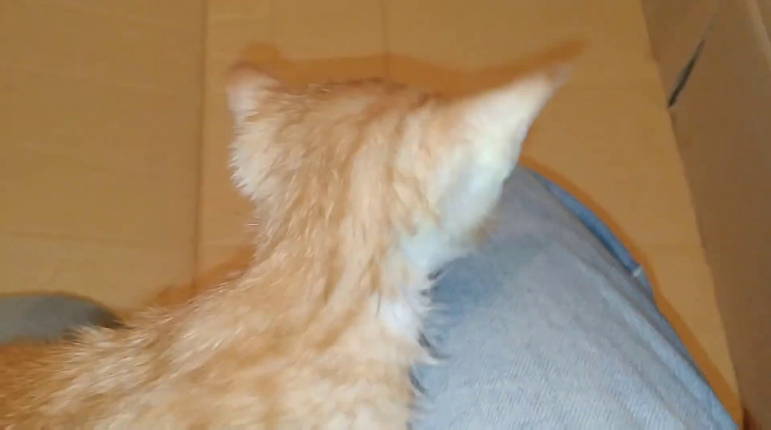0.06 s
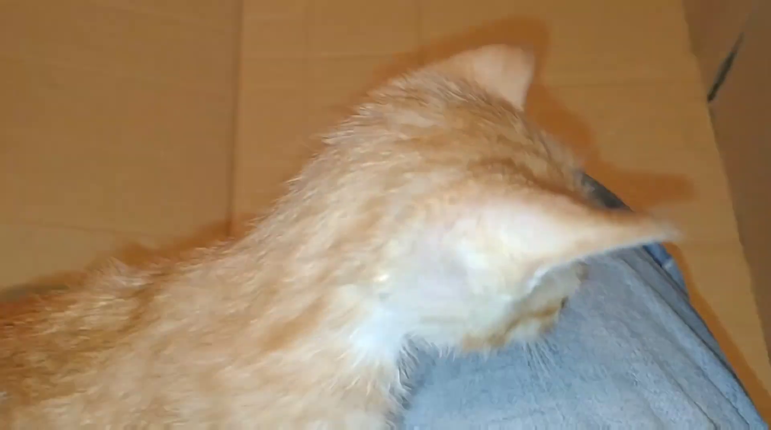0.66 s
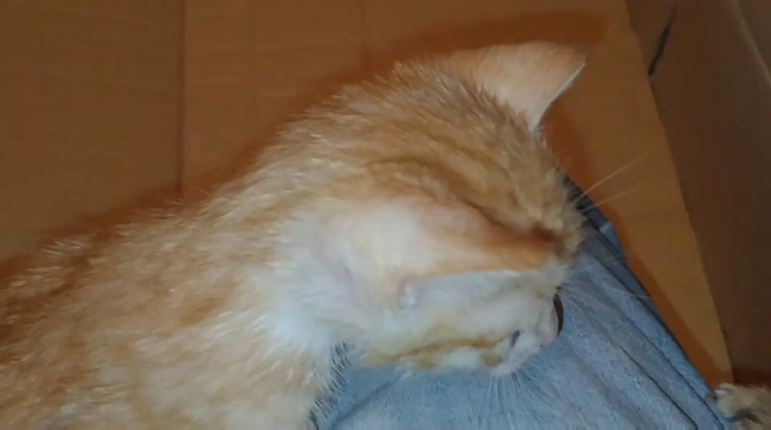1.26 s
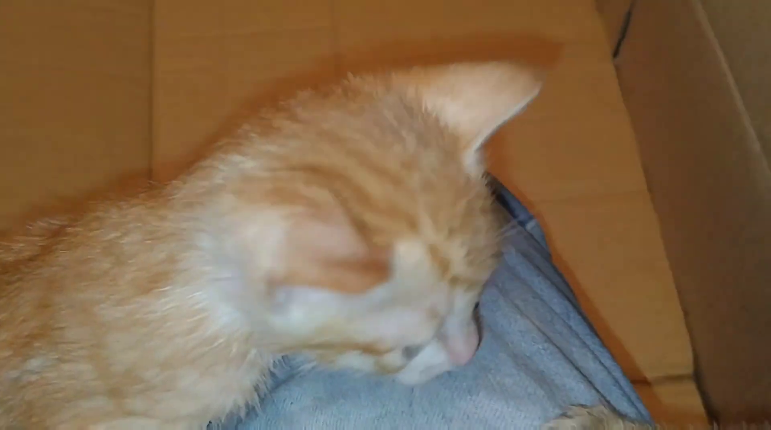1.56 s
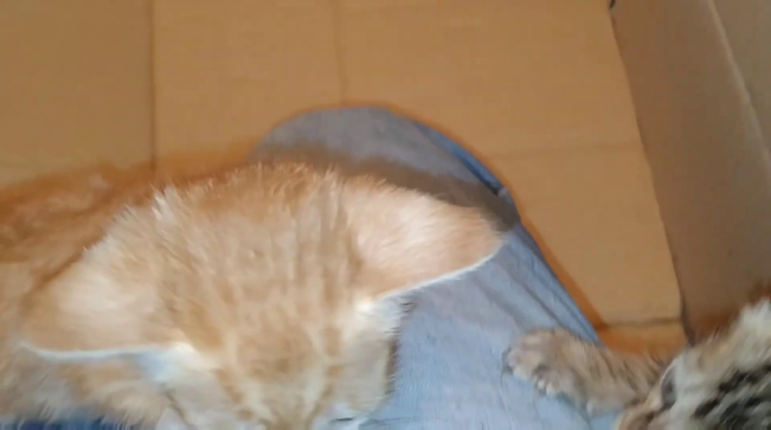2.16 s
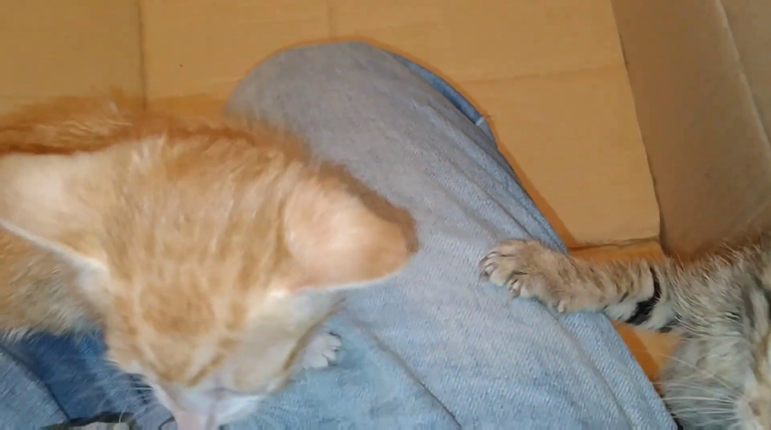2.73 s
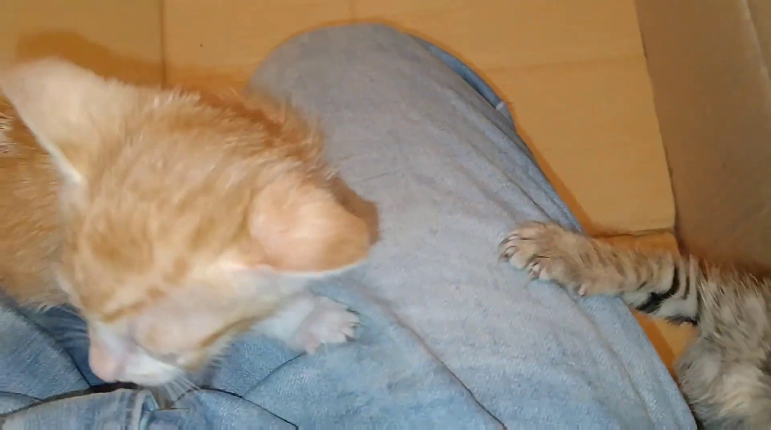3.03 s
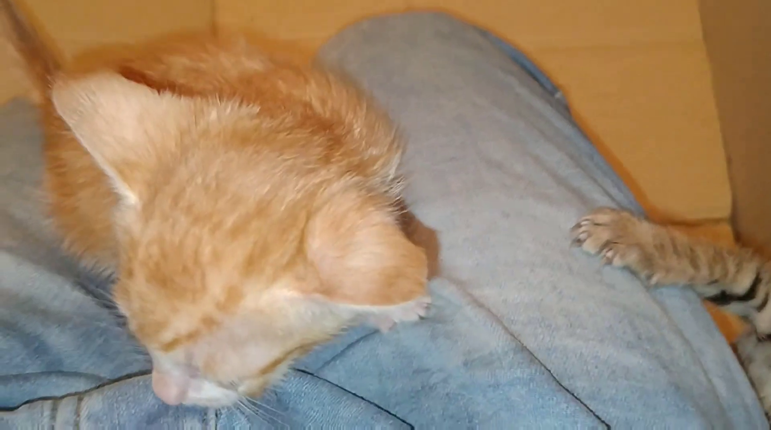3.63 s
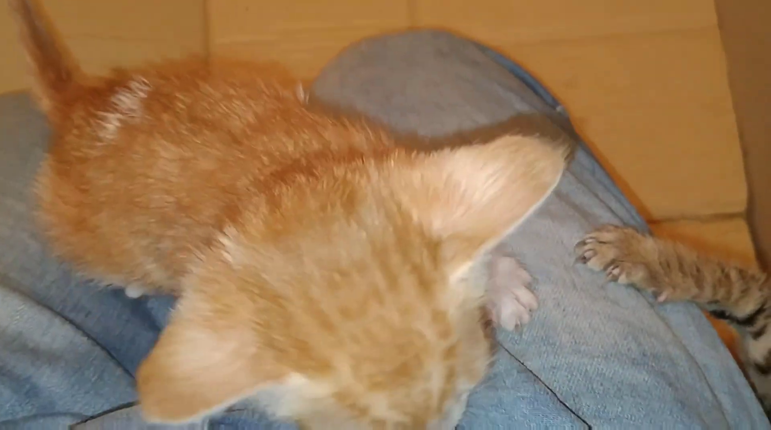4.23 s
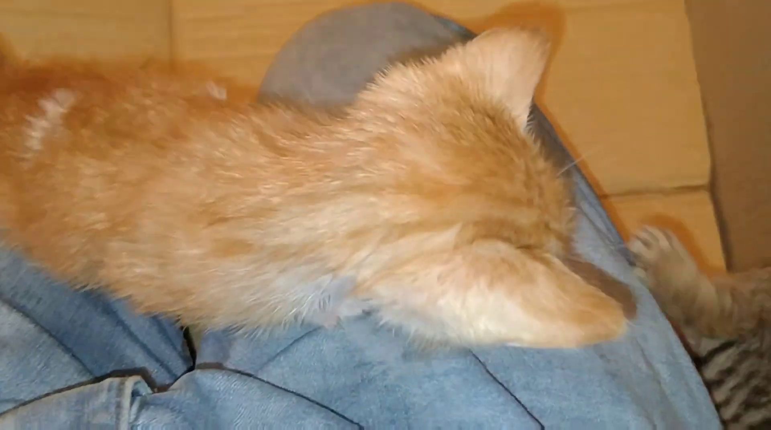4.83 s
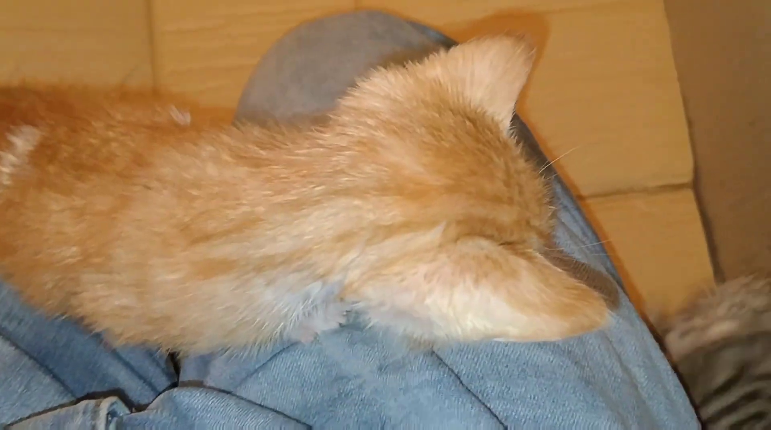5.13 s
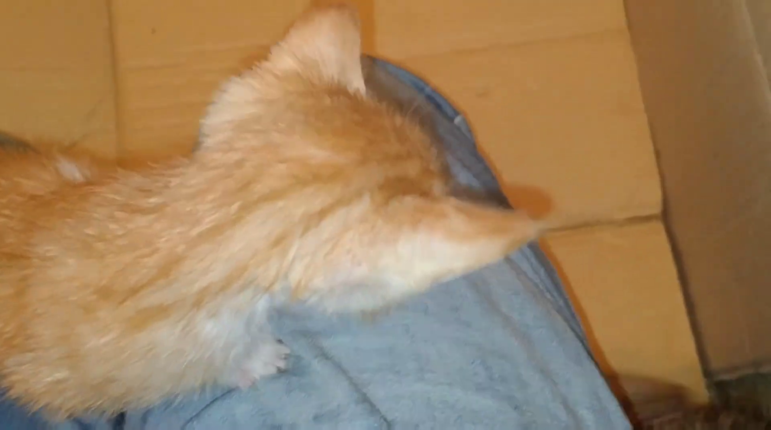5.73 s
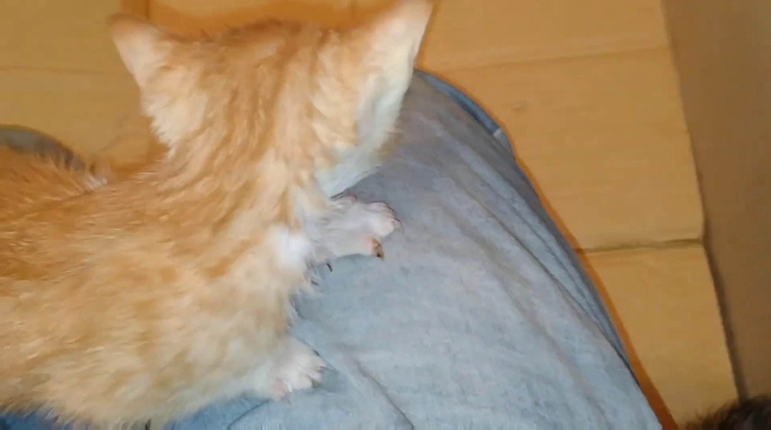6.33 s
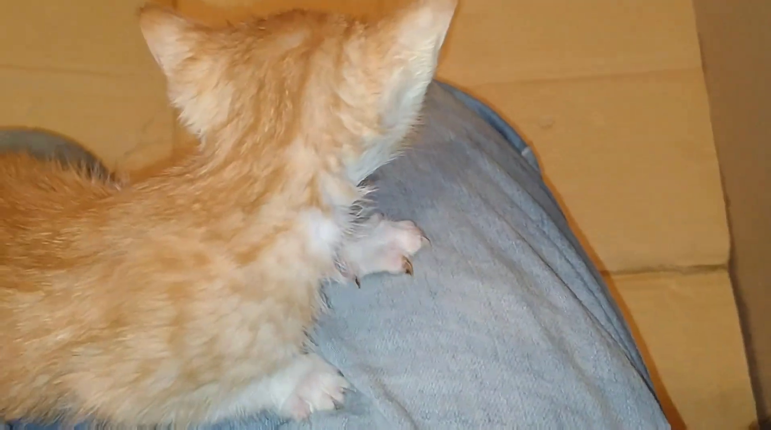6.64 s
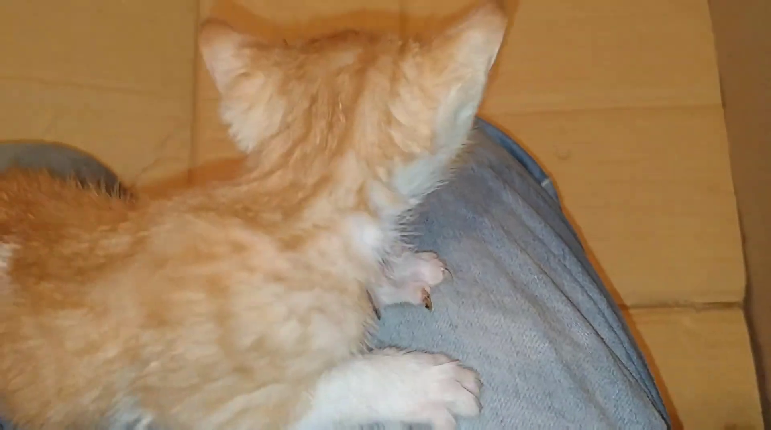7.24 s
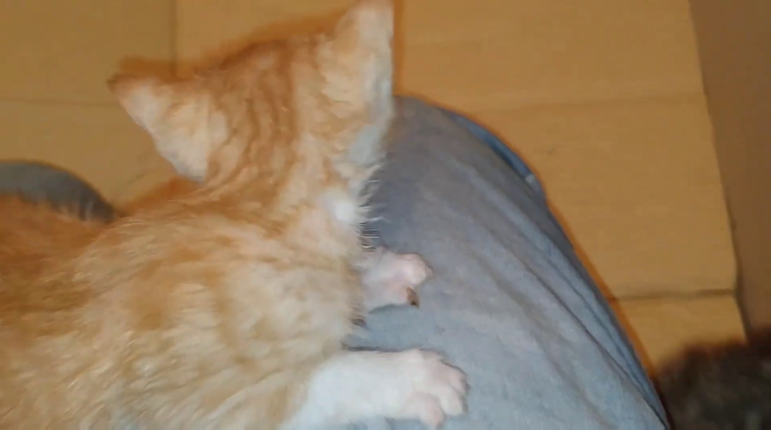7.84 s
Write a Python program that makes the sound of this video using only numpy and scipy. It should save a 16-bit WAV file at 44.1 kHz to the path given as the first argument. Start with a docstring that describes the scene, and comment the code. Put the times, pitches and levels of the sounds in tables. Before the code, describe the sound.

A kitten's claws scratch and pluck at denim and pat cardboard, with one faint mew in a quiet, humming room.

```python
"""A quiet room, a small microphone close to a cardboard box where two kittens clamber over a denim lap.
Claws snag and pluck the threads, paws drag over the cloth and pat the cardboard, and one hard scrape
judders as it sticks and slips. A kitten gives one thin, faint mew. Fur rustles throughout; behind it
lie the room's low hum and rumble, a bright hiss and a few faint whines."""
import sys
import numpy as np
from scipy import signal
from scipy.fft import rfft, irfft
from scipy.io import wavfile

SR = 44100
rng = np.random.default_rng(int(sys.argv[2]) if len(sys.argv) > 2 else 0)


def transcribe(u):
    """Save the signal u as a 16-bit wav file named by the first command-line argument.

    u: samples, shape (n,) or (channels, n), limited to [-1, 1]; the rate is SR.
    q: integer samples, one column per channel.
    """
    v = np.clip(np.atleast_2d(u).T, -1, 1)
    q = np.round(v * 32767).astype(np.int16)
    wavfile.write(sys.argv[1], SR, q)


N = 352032
T = np.arange(N) / SR

# Spectrum of a claw rasping on denim: f/Hz, relative level/dB
CLAW_SPECTRUM = [(200, -42.5), (1000, -35.5), (2000, -36), (2900, -34.5), (3700, -19.5), (4800, -13),
                 (5700, -8), (6250, -4.5), (6750, -0.5), (7400, 3.5), (7800, -5), (8200, -19.5),
                 (8700, -43.5)]
# Spectrum of a plucked thread: f/Hz, relative level/dB
THREAD_SPECTRUM = [(200, -39.5), (1000, -26.5), (2000, -41.5), (2950, -42.5), (3650, -25.5), (4700, -17.5),
                   (5700, -8), (6600, -1.5), (7400, 4), (7850, -2), (8250, -21), (8700, -32.5)]
# Spectrum of the cardboard's flutes crunching: f/Hz, relative level/dB
CRUNCH_SPECTRUM = [(100, -17), (300, 10.5), (500, 2), (900, 1.5), (1300, -7.5), (1750, -3.5), (2150, -21.5),
                   (2600, -26.5), (4000, -27)]


def claw_snags(snap_s=0.00064, fray_s=0.0038, ring_db=-17):
    """Close up, a claw plucks a thread: fibres snap in a burst, longer the more the thread frays."""
    # t/s, level/dB, treble tilt/(dB per kHz), fraying/0-1
    plucks = [(0.154, -54, 8, 0), (0.354, -53, 10, 0.15), (0.3584, -50, 11, 0.7), (0.452, -49, -.5, .15),
              (0.483, -54, -0.5, 0.1), (0.5981, -43.5, -2, 0.12), (0.633, -50.5, -3, 0.4),
              (0.884, -48.5, -6, .6), (0.9176, -50.5, -2.5, 0), (0.9507, -50.5, -3, 0.3),
              (1.043, -55.5, -3, 0.2), (1.1, -51, 1, .1), (1.107, -46, -2, 0), (1.2676, -54.5, -4.5, 0.6),
              (1.351, -52, -4, 0), (1.4464, -51, -.5, 0.8), (1.4691, -48, 1, 0), (1.5255, -41.5, -2, 0),
              (1.7157, -51, 1, 0), (2.5074, -51, 16, 0.3), (2.7061, -45, -4.5, 0.35), (2.721, -54, 0, 1),
              (2.7919, -51.5, -0.5, .7), (2.8875, -52, -1.5, 0.3), (3.035, -53, -1.5, 1),
              (3.0492, -57, 1, 1), (3.2602, -52, -0.5, 0.9), (3.736, -55.5, -7.5, .4),
              (3.8265, -50.5, -1.5, 0.3), (3.861, -53, -5, 0), (4.6105, -57.5, -6, 0.04),
              (4.662, -50, 18, .4), (4.6756, -54, -5, .9), (4.686, -51.5, 14, 0.4),
              (4.952, -50.5, 2.5, 0.1), (5.2307, -56.5, -2.5, .45), (5.2686, -51.5, 2.5, 0.5),
              (5.5082, -51, 2, 1), (5.6344, -37, 6, .3), (5.6506, -41, 0, 0.5), (5.8594, -55, 1.5, 0.9),
              (7.3645, -60, 7, 0.3)]
    out, t = np.zeros(N), np.arange(-128, 896) / SR
    for at, db, tilt, fray in plucks:
        burst = np.exp(-np.maximum(t / (snap_s + fray * fray_s), -t / snap_s) ** 2)
        small_snaps = rng.standard_normal(len(t)) * burst
        main_snap = .5 * (1 - fray) * (t == 0)
        snap = colour(small_snaps / np.linalg.norm(small_snaps) + main_snap, THREAD_SPECTRUM, tilt)
        add(out, at + t[0], amp(db) * short_unit(snap))
    return in_box(out, ring_db, t60=0.033)


def paw_drags(box_gain_db=-1, flutes_db=-3, squareness=1.4):
    """A paw slides over the weave: a swell of fibre clicks, while the cardboard murmurs below."""
    # peak t/s, length/s, hiss level/dB, treble tilt/(dB per kHz), relative cardboard level/dB
    strokes = [(0.099, 0.097, -25.5, 2, -39.5), (0.225, 0.28, -54, 2, -67.5),
               (0.545, .045, -55, 0.5, -65.5), (0.632, 0.21, -58, 1.5, -66.5),
               (0.902, 0.19, -54.5, 0.5, -66), (1.591, 0.64, -63, 1.5, -70), (1.874, 0.078, -58.5, 1, -72),
               (2.326, 0.032, -58.5, 1, -71), (2.606, .18, -64.5, 2, -56.5), (2.72, 0.19, -57.5, 0.5, -62),
               (2.837, 0.026, -53, 2.5, -78), (3.102, 0.065, -59.5, 3, -74), (3.275, 0.074, -57, 1.5, -67),
               (3.48, 0.19, -57.5, 1.5, -77), (3.869, 0.45, -65, -0.5, -79), (4.404, 0.084, -60, -2, -62),
               (4.683, 0.17, -56.5, -2, -64.5), (4.817, .045, -62.5, 5, -75),
               (5.589, 0.024, -56, -.5, -57.5), (5.643, 0.08, -38, 2.5, -59.5),
               (5.693, 0.1, -46.5, 3, -61.5), (6.102, 0.048, -71, -4, -87), (7.029, 0.038, -52.5, 3, -74),
               (7.207, 0.054, -57, 4, -74), (7.459, .05, -64.5, 3, -74), (7.549, 0.23, -67, -1.5, -65.5),
               (7.907, .018, -61, -3.5, -67.5), (7.964, .046, -58, 1, -68)]
    # Rubbed cardboard: f/Hz, relative level/dB
    box_spectrum = [(60, -28), (170, -16), (300, 0), (450, -3.5), (800, -1.5), (1100, -11.5), (1500, -15),
                    (2000, -20.5), (2700, -32.5), (4000, -40.5)]
    out, t = np.zeros(N), np.arange(-6000, 8000) / SR
    for at, length, db, tilt, box_db in strokes:
        bare = np.clip(-tilt / 3, 0, 1)  # dull strokes cross bare cardboard: abrupt, rasping its flutes
        swell = amp(-20 * abs(2 * t / length) ** (1.1 + squareness * bare))  # 20 dB down at both ends
        hiss = colour(fibres(len(t), per_s=1700, spread_db=1, smooth=0.34), CLAW_SPECTRUM, tilt)
        murmur = colour(fibres(len(t), per_s=790, spread_db=11, smooth=0.44), box_spectrum)
        flutes = colour(fibres(len(t), per_s=900, spread_db=1, smooth=0.33), CRUNCH_SPECTRUM)
        cardboard = np.sqrt(1 - .5 * bare) * murmur + bare * amp(flutes_db) * flutes
        sound = swell * (amp(db) * hiss + amp(box_db + box_gain_db) * cardboard)
        add(out, at + t[0], sound[at + t >= 0])
    return out


def claw_scrape(at=0.088, bite_s=0.0112, db=-25.5, sag_db_per_s=191, rasp_db=-7, rasp_s=0.0016):
    """A claw bites, sags and lets go; each slip on the way kicks the cardboard and tears off a rasp."""
    grip_hz, skid_hz, skid_at, skid_rise_s = 300, 420, .112, .008
    skid = np.clip((T - skid_at) / skid_rise_s, 0, 1)  # halfway the claw skids and the slips quicken
    slip_hz = (grip_hz + (skid_hz - grip_hz) * skid) * np.exp(0.11 * wander(220))
    sag_db = sag_db_per_s * np.maximum(T - at - bite_s, 0)
    level = amp(db - sag_db) * envelope(at, bite_s, hold=0.0355, release=0.005) ** 2
    slip_count = np.floor(np.cumsum(slip_hz) / SR)
    slips = np.diff(slip_count, prepend=0) * np.sqrt(SR / slip_hz)
    slip_tails = signal.lfilter([1], [1, -np.exp(-1 / (rasp_s * SR))], slips)
    tear = unit(slip_tails) * rng.standard_normal(N)
    # Cardboard kicked by a slip: f/Hz, relative level/dB
    kick_spectrum = [(60, -16), (170, 3.5), (290, -5), (450, -3), (650, -7.5), (900, -13), (1200, -24),
                     (1600, -36), (2200, -38), (3200, -50)]
    kicks = colour(-slips * level, kick_spectrum)
    return kicks + amp(rasp_db) * colour(tear * level, CLAW_SPECTRUM, tilt=1)


def paw_pats(bare_ring_db=-5, padding_db=-35.5, crunch_s=0.0016, push_db=-7, push_s=0.00072):
    """A paw lands on a limp surface: a dull push, a cycle or two of pitch, a crunch, then the box rings."""
    # t/s, level/dB, surface f/Hz, relative crunch level/dB, padding (near 0 bare cardboard, near 1 the lap)
    landings = [(0.3554, -47.5, 690, -10, 0), (1.1056, -60.5, 930, -3, 0), (1.268, -60.5, 500, -1, .05),
                (1.448, -59.5, 557, -12, 0.6), (2.2869, -55, 448, -10, 0.1), (2.705, -55, 740, 5, .45),
                (2.7915, -53, 570, -14, 0.4), (2.8844, -59, 570, 2, 0), (2.9427, -63.5, 626, 9, 2),
                (3.0357, -60.5, 850, .5, 1), (3.324, -60, 200, -25, 0.6), (3.7353, -55, 760, -7, 0.3),
                (3.7993, -61.5, 706, -6.5, 0.4), (5.2695, -48.5, 460, 0, .1), (5.511, -53.5, 490, -9, 0.5),
                (5.66, -53, 830, -2, 0), (5.8614, -52, 570, -22, -0.16), (7.053, -67, 820, -25, 0),
                (7.652, -51.5, 59, -39, 1), (7.7752, -53, 376, -20, 0.55), (7.8367, -60, 440, -16, 0.2),
                (7.866, -60.5, 444, -19, 0.4)]
    out, t = np.zeros(N), np.arange(8000) / SR
    for at, db, hz, crunch_db, padding in landings:
        ring_db = bare_ring_db + padding_db * padding
        loss = amp(-ring_db / 2)  # a padded spot stops sooner and barely rings the box
        flex = t ** 2 * np.exp(-2 * loss * hz * t) * np.sin(2 * np.pi * hz * t)
        pulse = t * (1 - t / (2 * push_s)) * np.exp(-t / push_s)
        push = amp(push_db + padding_db * padding ** 4) * unit(pulse)
        crunch = colour(rng.standard_normal(len(t)) * t * np.exp(-2 * t / crunch_s), CRUNCH_SPECTRUM)
        blow = short_unit(unit(flex) + amp(crunch_db) * unit(crunch) + push)
        add(out, at, amp(db) * in_box(blow, ring_db, t60=0.24))
    return out


def mew(at=.165, length=.285, rise_s=0.079, fall_s=0.026, db=-72, octave_db=-5.5):
    """A kitten's thin falling squeak, nearly a sine, blurred by the walls of the box."""
    top_hz, shut_hz, end_hz = 1900, 1520, 1360
    hz = top_hz + (end_hz - top_hz) * np.clip((T - at) / length, 0, 1) ** .76  # steepest at first
    phase = 2 * np.pi * np.cumsum(hz * (1 + 0.011 * wander(90))) / SR
    catch_db = -16 * np.exp(-((T - 0.33) / 0.009) ** 2)  # a short catch in the voice
    shimmer_db = 2 * wander(40)
    level = amp(db + catch_db + shimmer_db) * envelope(at, rise_s, length - rise_s - fall_s, fall_s)
    opening = np.clip((hz - shut_hz) / (top_hz - shut_hz), 0, 1) ** .5  # the octave fades as the mouth shuts
    voice = np.sqrt(2) * level * (np.sin(phase) + opening * amp(octave_db) * np.sin(2 * phase))
    return in_box(voice, ring_db=-8, t60=0.28)


def stirring(brush_db=-1.5, creep_db=-1.5, prickle_db=-12, tick_db=-15):
    """Fur brushes denim with stray prickles and claw ticks; the box creeps under the moving weight."""
    # How much the kittens stir: t/s, relative fur level/dB, relative box level/dB
    activity = [(0.0, -58.5, -59.5), (0.24, -64.5, -66.5), (0.87, -67.5, -71), (1.47, -64, -66),
                (1.71, -67, -72), (2.27, -65.5, -67), (2.75, -65, -69), (3.0, -66, -72.5),
                (3.71, -64.5, -68), (4.09, -73, -74), (4.4, -73, -74.5), (4.76, -68, -70.5),
                (5.29, -71, -72.5), (5.62, -62.5, -66.5), (6.11, -76, -74), (7.31, -74.5, -77.5),
                (7.69, -70, -68), (7.98, -68, -71)]
    # Fur on denim: f/Hz, relative level/dB
    fur_spectrum = [(1000, -39), (2900, -29), (3800, -22), (4900, -12.5), (5800, -7.5), (6600, -1.5),
                    (7500, 5.5), (7850, -3), (8200, -13), (8700, -49.5)]
    # The box under shifting weight: f/Hz, relative level/dB
    creep_spectrum = [(100, -19), (200, 2), (300, 3), (420, -2), (600, -6.5), (850, -6.5), (1200, -16),
                      (2000, -22.5), (3000, -28.5), (5000, -38)]
    flutter_db = 1.5 * wander(11)
    brush = colour(fibres(N, per_s=10000, spread_db=9.5, smooth=0.62), fur_spectrum)
    prickle = colour(fibres(N, per_s=190, spread_db=5.5, smooth=0), CLAW_SPECTRUM, tilt=-0.94)
    creep = colour(fibres(N, per_s=600, spread_db=2.5, smooth=0.81), creep_spectrum)
    ticks = colour(fibres(N, per_s=17, spread_db=4.5, smooth=0), THREAD_SPECTRUM, tilt=-2.1)
    rustle = amp(brush_db) * brush + amp(prickle_db) * prickle + amp(tick_db) * ticks
    rustle *= amp(curve(activity, 1) + flutter_db)
    return rustle + amp(curve(activity, 2) + flutter_db + creep_db) * creep


def whines(gain_db=-4, width_hz=22, steady=0.6):
    """Faint, thin tones in the room fade in and out, each with a flutter of its own."""
    # start t/s, end t/s, f/Hz, relative level/dB
    tones = [(3.94, 4.285, 759, -75), (4.72, 5.3, 2980, -88), (4.8, 5.5, 3350, -88), (4.85, 5.3, 2560, -89),
             (5.845, 7.052, 3570, -93)]
    out = np.zeros(N)
    for start, end, hz, db in tones:
        on = (T > start) & (T < end)
        flutter = (wander(width_hz) + 1j * wander(width_hz) + steady) / np.sqrt(2)
        tone = (flutter[on] * np.exp(2j * np.pi * hz * T[on])).real
        out[on] += amp(db + gain_db) * tone * signal.windows.tukey(on.sum(), .5)
    return out


def room_tone(hum_hz=152.8, rumble_db=-65.5, drone_gain_db=4, hiss_db=-75):
    """Behind the kittens: wavering hum lines, low rumble, a swelling drone and a steady, bright hiss."""
    # Slow swell: t/s, level of the lowest hum line/dB, relative drone level/dB
    swell = [(0.3, -76.5, -70), (0.73, -76, -81.5), (1.33, -72, -72.5), (1.86, -75, -79.5),
             (3.64, -73, -74.5), (3.77, -74, -69.5), (4.28, -69.5, -68), (5.8, -80, -71),
             (6.12, -68.5, -73), (6.63, -86.5, -80.5), (7.14, -69.5, -78.5), (7.36, -85, -73.5),
             (7.98, -81, -72)]
    # The steadier upper hum lines: f/Hz, level/dB
    upper_lines = [(183, -80), (283, -81), (430, -87)]
    # Spectra of the three noises: f/Hz, relative level/dB
    rumble_spectrum = [(10, -6.5), (25, 6.5), (40, 2.5), (52, -10), (70, -10.5), (90, -4), (125, -12),
                       (165, -2.5), (215, -24), (290, -14.5), (500, -29), (1500, -39), (6000, -80)]
    drone_spectrum = [(15, -21), (40, -5.5), (54, -10), (64, 2.5), (71, -11), (88, -24.5), (140, -27.5),
                      (300, -47), (3000, -78.5)]
    hiss_spectrum = [(500, -28), (1500, -33), (2900, -22.5), (4200, -18), (5300, -18), (6100, -13),
                     (6650, 5), (7100, -6.5), (7600, -2), (7950, -13.5), (8300, -17), (8700, -41.5)]
    hum = amp(curve(swell, 1)) * hum_line(hum_hz)
    hum += sum(amp(db) * hum_line(hz) for hz, db in upper_lines)
    rumble = amp(rumble_db) * colour(rng.standard_normal(N), rumble_spectrum, size=16384)
    drone = colour(rng.standard_normal(N), drone_spectrum, size=32768)
    drone *= amp(curve(swell, 2) + drone_gain_db)
    hiss = amp(hiss_db) * colour(rng.standard_normal(N), hiss_spectrum)
    return hum + rumble + drone + hiss


def hum_line(hz, drift_hz=2, throb_db=2):
    """One line of the hum, of rms about 1, wavering in pitch and level."""
    level = np.sqrt(2) * amp(throb_db * wander(3))
    return level * np.sin(2 * np.pi * np.cumsum(hz + drift_hz * wander(5)) / SR)


def fibres(count, per_s, spread_db, smooth):
    """Threads letting go: random clicks of uneven size over a share of smooth friction."""
    size = amp(spread_db * np.minimum(rng.exponential(1, count), 3.5))
    clicks = size * rng.choice([-1, 1], count) * (rng.random(count) < per_s / SR)
    return np.sqrt(1 - smooth) * unit(clicks) + np.sqrt(smooth) * rng.standard_normal(count)


def in_box(sound, ring_db, t60):
    """The direct sound plus its reflections between the cardboard walls."""
    t = np.arange(6000) / SR
    tail = rng.standard_normal(len(t)) * amp(-60 * t / t60) * (t > .003)
    return sound + amp(ring_db) * signal.fftconvolve(sound, tail / np.linalg.norm(tail))[:len(sound)]


def colour(x, spectrum, tilt=0, size=2048):
    """Gives x a spectrum through a causal filter of energy 1, its treble tilted in dB per kHz."""
    hz = abs(np.fft.fftfreq(size, 1 / SR))
    f, db = np.transpose(spectrum)
    db = np.interp(np.log(hz + 1), np.log(f), db) + tilt * (np.clip(hz, 4400, 7600) - 7000) / 1000
    minimum_phase = np.exp(np.conj(signal.hilbert(np.log(amp(db)))))
    impulse = np.fft.ifft(minimum_phase).real[:size // 2]
    return signal.fftconvolve(x, impulse / np.linalg.norm(impulse))[:len(x)]


def wander(hz):
    """Random drift of rms 1, up to about the given rate."""
    f = np.fft.rfftfreq(N, 1 / SR)
    return unit(irfft(rfft(rng.standard_normal(N)) / (1 + (f / hz) ** 4), N))


def envelope(start, attack, hold, release):
    """A straight rise, a hold at 1 and a straight fall."""
    return np.clip(np.minimum((T - start) / attack, (start + attack + hold + release - T) / release), 0, 1)


def curve(rows, column):
    """A column of a table, joined by straight lines over time."""
    rows = np.asarray(rows)
    return np.interp(T, rows[:, 0], rows[:, column])


def amp(db):
    return 10 ** (np.asarray(db) / 20)


def unit(x):
    return x / np.sqrt(np.mean(x ** 2) + 1e-20)


def short_unit(x):
    """Scales a brief sound to the energy of 5 ms at rms 1."""
    return x * np.sqrt(.005 * SR) / np.linalg.norm(x)


def add(mix, at, sound):
    part = mix[max(round(at * SR), 0):][:len(sound)]
    part += sound[:len(part)]


def scene():
    """One microphone: the kittens close up, the room behind them."""
    kittens = claw_snags() + paw_drags() + claw_scrape() + paw_pats() + mew() + stirring()
    return (kittens + whines() + room_tone())[None]


def record(dry):
    """The recorder cuts the treble steeply at 8720 Hz."""
    lowpass = signal.firwin(511, 8720, window=("kaiser", 9), fs=SR)
    return signal.oaconvolve(dry, lowpass[None], "same")


dry = scene()
out = record(dry)
transcribe(out)
```